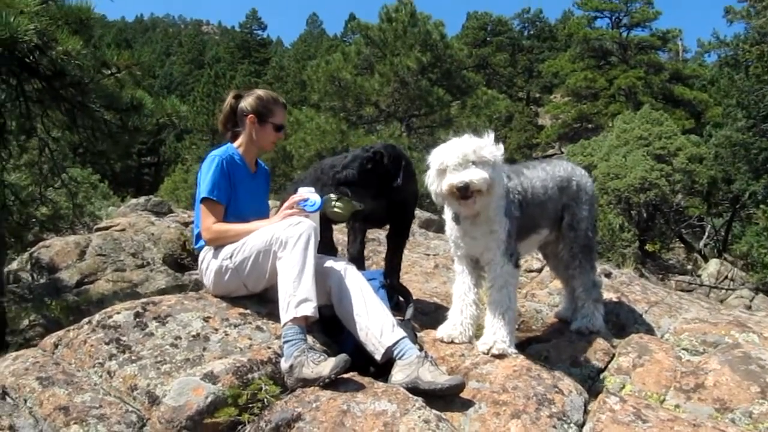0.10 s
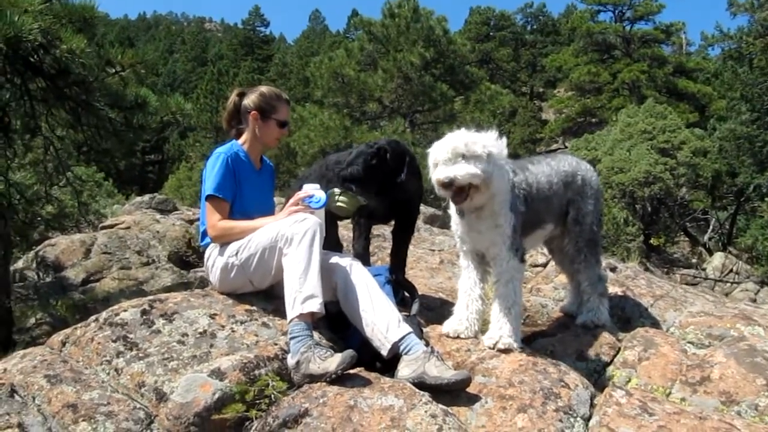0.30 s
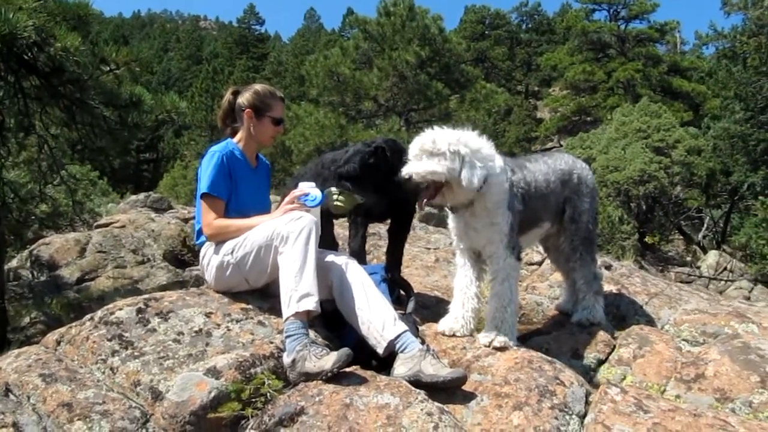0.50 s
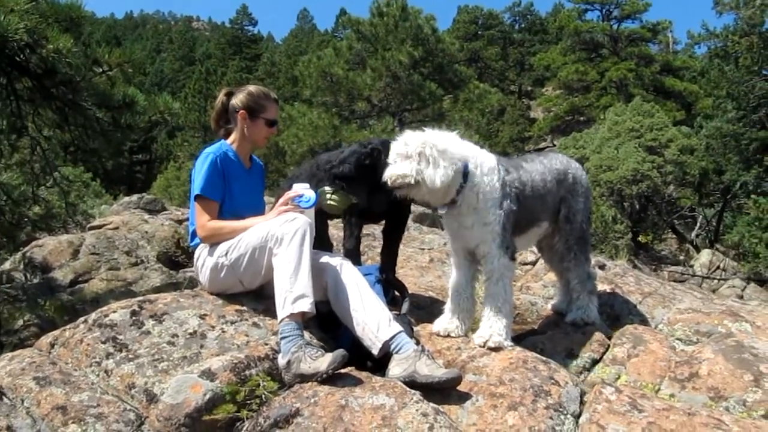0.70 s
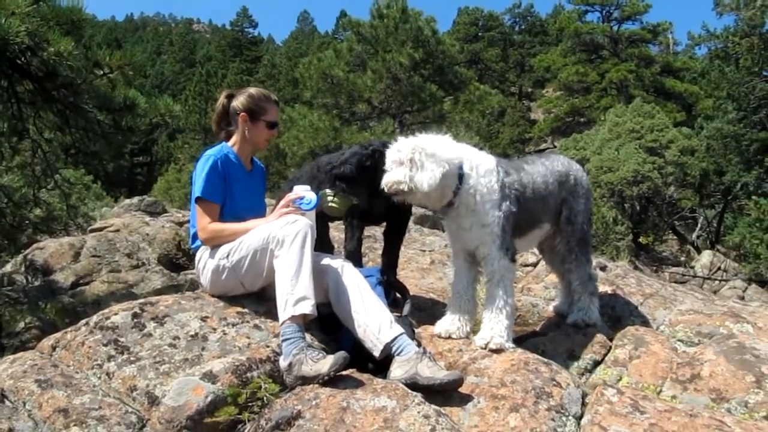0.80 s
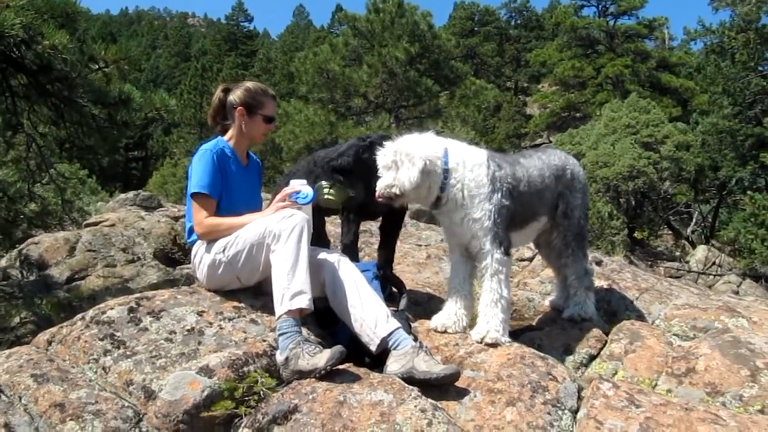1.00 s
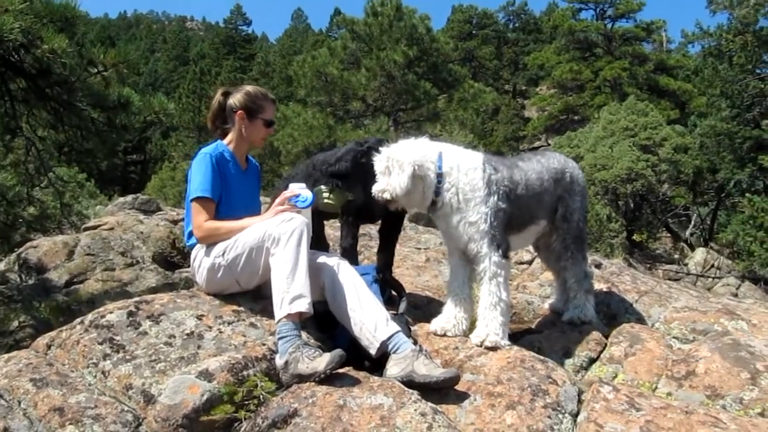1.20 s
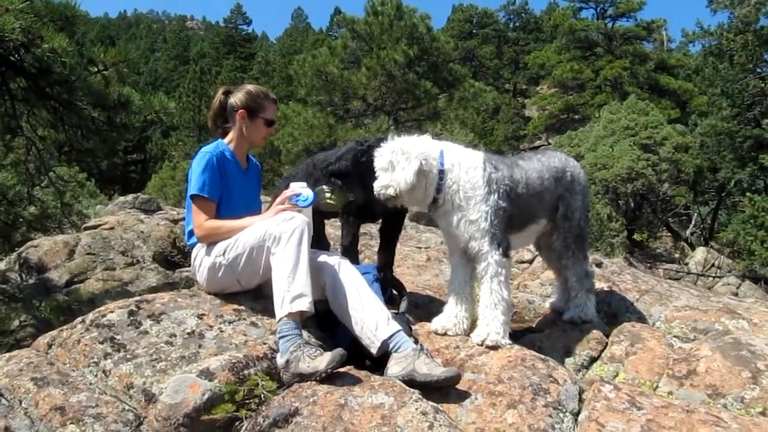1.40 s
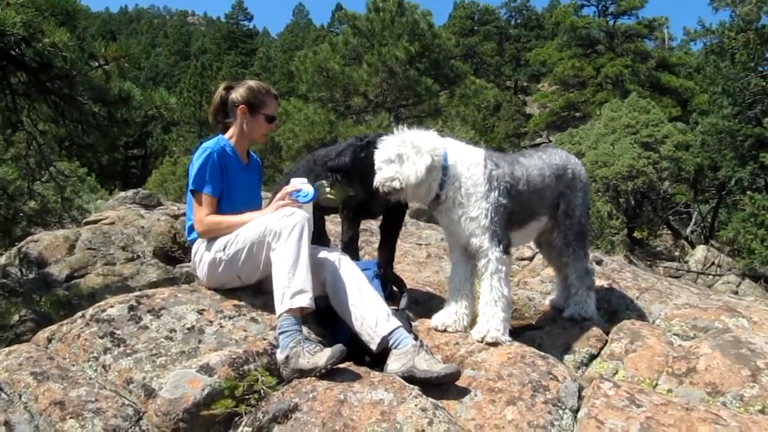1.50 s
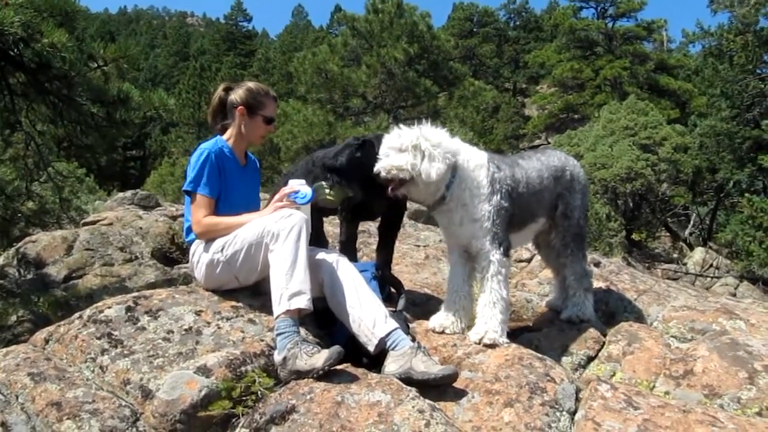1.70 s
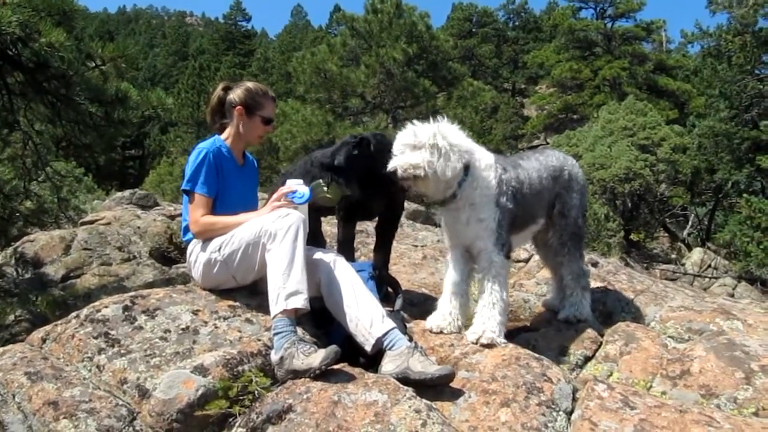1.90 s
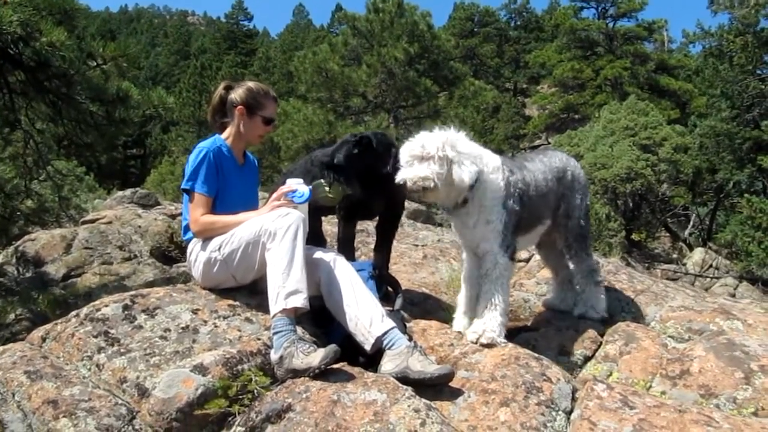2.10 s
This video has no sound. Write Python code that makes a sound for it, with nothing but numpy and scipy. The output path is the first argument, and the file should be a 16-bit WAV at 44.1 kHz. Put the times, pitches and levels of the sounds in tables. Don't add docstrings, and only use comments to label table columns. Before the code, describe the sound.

A dog laps water from a small cup in quick wet laps while wind buffets the microphone.

```python
import sys
import numpy as np
from scipy import signal
from scipy.fft import rfft, irfft
from scipy.io import wavfile
from scipy.ndimage import uniform_filter1d

SR = 44100
rng = np.random.default_rng(int(sys.argv[2]) if len(sys.argv) > 2 else 0)


def ratio_of_db(decibels):
    return 10 ** (np.asarray(decibels, float) / 20)


def log_audio(samples):
    frames = np.atleast_2d(samples).T
    limited = np.clip(frames, -1, 1)
    pcm = np.round(limited * 32767).astype(np.int16)
    wavfile.write(sys.argv[1], SR, pcm)


N = 94815


def evened(x):
    return x / np.sqrt(np.mean(x ** 2) + 1e-20)


def add(mix, s, sound):
    part = mix[max(round(s * SR), 0):][:len(sound)]
    part += sound[:len(part)]


def coloured(x, points):
    f, db = np.transpose(points)
    hz = np.fft.rfftfreq(len(x), 1 / SR)
    gain = ratio_of_db(np.interp(np.log(hz + 1), np.log(f + 1), db, -90, -90))
    return evened(irfft(rfft(x) * gain, len(x)))


def resonate(x, hz, width):
    turn = np.exp(2j * np.pi * hz * np.arange(len(x)) / SR)
    r = np.exp(-np.pi * width / SR)
    return 2 * (turn * signal.lfilter([1 - r], [1, -r], x / turn)).real


def steep(x, hz, width):
    for _ in range(3):
        x = resonate(x, hz, width)
    return evened(x)


def wander(size, length=N):
    noise = rng.standard_normal(length)
    return evened(uniform_filter1d(uniform_filter1d(noise, size), size))


def swells(rows, rise=0.05):
    out = np.zeros(N)
    for s, length, db in rows:
        u = np.arange(0, 1, 1 / (length * SR))
        fade = np.minimum((1 - u) / (1 - rise), 1) ** 0.38
        add(out, s, ratio_of_db(db) * np.minimum(u / rise, 1) * fade)
    return out


def trees():
    # f/Hz, level/dB
    leaf_spectrum = [(120, 1.5), (200, -1), (700, 0.5), (2100, -15), (7000, -27), (8000, -26), (11000, -29),
                     (15600, -41)]
    t = np.arange(N) / SR
    level_db = -38 - 2.5 * t + wander(size=400)
    return coloured(rng.standard_normal(N), leaf_spectrum) * ratio_of_db(level_db)


def whine():
    # f/Hz, level/dB
    tones = [(7853, -65), (7882, -58.5)]
    t = np.arange(N) / SR
    out = ratio_of_db(-69) * steep(rng.standard_normal(N), 7870, 260)
    for hz, db in tones:
        out += ratio_of_db(db - t + 0.33 * wander(size=2000)) * np.sin(2 * np.pi * hz * t)
    return out


def wind():
    # t/s, rumble level/dB, flutter relative to rumble/dB
    strength = [(0, -36, -6), (.25, -26.5, -4.5), (.4, -31, 7), (.47, -32, -0.5), (.56, -23, -8),
                (.7, -26, -8.5), (.77, -28.5, -2.5), (0.851, -17, -7.5), (1.04, -34.5, 9.5),
                (1.11, -22, -15), (1.221, -15, -4), (1.331, -24.5, 0), (1.52, -28.5, 8), (1.6, -27, -27),
                (1.69, -26.5, -6.5), (1.75, -21.5, -19), (1.88, -27.5, -6.5), (1.94, -25, -8),
                (2.15, -40, 5)]
    # f/Hz, level/dB
    rumble_spectrum = [(8, -10), (20, 13.5), (50, 7), (90, -9), (150, -59)]
    # f/Hz, level/dB
    flutter_spectrum = [(25, -17.5), (70, 1), (130, -9), (220, -18), (400, -26), (800, -86)]
    # centre t/s, peak level/dB, f/Hz, width/s
    eddies = [(0.296, -10.5, 123, 0.03), (0.352, -18, 151, 0.014), (0.39, -13.5, 120, 0.01),
              (0.865, 1.5, 178, 0.0075), (0.874, -9.5, 201, 0.0071), (0.919, -12, 110, 0.016),
              (0.995, -5, 102, 0.012), (1.027, -3.5, 97.5, 0.019), (1.169, -7, 200, 0.0091),
              (1.222, -7, 39.7, 0.033), (1.248, -2.5, 96.4, 0.022), (1.269, -7, 100, 0.03),
              (1.304, -7.5, 113, 0.01), (1.413, 0.5, 232, 0.0092), (1.453, -21.5, 217, 0.065),
              (1.47, -8.5, 149, 0.015), (1.484, -4.5, 326, 0.006), (1.496, -1, 180, 0.012),
              (1.505, -4, 200, 0.0044), (1.633, -13.5, 118, 0.015), (1.739, -13.5, 117, 0.015),
              (1.793, -12.5, 109, 0.0085), (1.871, -13.5, 77, 0.03), (1.431, -11.5, 92, 0.01),
              (1.519, -17.5, 88, 0.017), (1.5024, 0, 196, 0.0069), (1.4808, -1, 332, 0.0037),
              (1.536, -19.5, 220, 0.0065), (.712, -13.5, 25, 0.085), (0.889, -11.5, 111, 0.011),
              (1.336, -26, 150, 0.0087), (1.377, -13, 150, 0.0047), (1.032, -18, 206, 0.012),
              (1.4845, -15.5, 535, 0.0023), (1.4148, -11, 457, 0.0019), (0.317, -17.5, 165, 0.0068),
              (.967, -17, 129, 0.02), (1.211, -12.5, 172, 0.0072), (.95, -12.5, 99, 0.017),
              (1.49, -13, 400, 0.0071), (1.523, -22.5, 300, 0.0094)]
    s, db, rel_db = np.transpose(strength)
    t = np.arange(N) / SR
    rumble_db = np.interp(t, s, db)
    flutter_db = rumble_db + np.interp(t, s, rel_db) + 2.07 * wander(size=500)
    out = ratio_of_db(rumble_db) * coloured(rng.standard_normal(N), rumble_spectrum)
    out += ratio_of_db(flutter_db) * coloured(rng.standard_normal(N), flutter_spectrum)
    u = np.arange(-1500, 1500) / SR
    for s, db, hz, width in eddies:
        swirl = rng.standard_normal(3000)
        turns = hz * u * (1 + 0.23 * u / width) + swirl[0]
        thump = np.cos(2 * np.pi * turns) * np.exp(-(2.95 * u / width) ** 2)
        churn = 0.22 * steep(swirl, 1.6 * hz, 1.4 * hz) * np.exp(-(1.6 * u / width) ** 2)
        add(out, s + u[0], ratio_of_db(db - 1.5) * (thump + churn))
    return out


def spray():
    # start t/s, length/s, level/dB
    strokes = [
        (0., 0.22, -49),
        (.215, 0.11, -41.5),
        (.575, .13, -40.5),
        (.89, 0.045, -40),
        (1.205, 0.077, -40.5),
        (1.52, 0.075, -43.5),
        (1.835, 0.082, -42),
    ]
    # f/Hz, level/dB
    spray_spectrum = [(410, -50), (700, -51), (895, -10), (1560, -8.5), (2310, -14.5), (4580, -20.5),
                      (7120, -29.5), (10500, -22.5), (15500, -52)]
    bursts_per_s, spread_db, idle_db = 3400, 5, -53.5
    burst = rng.random(N) < bursts_per_s / SR
    size = ratio_of_db(spread_db * np.minimum(rng.exponential(1, N), 4)) * burst
    kind = rng.integers(0, 24, N)
    t, fizz = np.arange(600) / SR, np.zeros(N)
    for k, hz in enumerate(np.geomspace(800, 13000, 24)):
        grain = np.sin(2 * np.pi * hz * t) * ratio_of_db(-60 * t * hz ** 0.72 / 3.4)
        grain *= hz ** 0.5 / np.linalg.norm(grain)
        fizz += signal.oaconvolve(size * (kind == k), grain)[:N]
    hiss = 0.45 * rng.standard_normal(N) * ratio_of_db(4.5 * wander(size=150))
    wet = coloured(evened(fizz) + hiss, spray_spectrum)
    return wet * (swells(strokes, rise=0.1) + ratio_of_db(idle_db))


def pants():
    # start t/s, length/s, level/dB, airway f/Hz
    breaths = [
        (0.049, 0.062, -40, 3090),
        (0.313, 0.077, -43, 2960),
        (0.456, 0.031, -45, 2740),
        (1.788, 0.074, -45.5, 2660),
    ]
    out = np.zeros(N)
    for s, length, db, hz in breaths:
        breath = rng.standard_normal(round(length * SR))
        air = steep(breath, hz, 390)
        air += 0.47 * steep(breath, 0.74 * hz, 290)
        air += 0.15 * steep(breath, 1.48 * hz, 600)
        swell = np.sin(np.pi * np.arange(len(breath)) / len(breath)) ** 0.51
        add(out, s, ratio_of_db(db) * evened(air) * swell)
    return out


def drops():
    # t/s, peak level/dB, f/Hz
    early_drops = [(.066, -18.5, 4830), (.1635, -28, 10400), (.219, -25.5, 10600), (.228, -34, 10700),
                   (.239, -20.5, 10400), (.276, -18.5, 4600), (.295, -25, 4950), (.317, -19.5, 5000),
                   (.512, -18, 4300), (.5975, -20, 4800), (.606, -17.5, 6160), (.6257, -28, 8600),
                   (.637, -27, 10300), (.804, -21.5, 4640), (.826, -21, 3570), (.897, -23, 9300),
                   (.932, -23.5, 9800), (.9465, -28, 10000), (.9855, -15.5, 4320), (.994, -16, 4700),
                   (1.0445, -23, 5230), (1.2446, -25, 10200), (1.36, -17, 9500), (1.367, -23.5, 4400),
                   (1.446, -21.5, 3700), (1.5664, -30, 8150), (1.5756, -18.5, 10500)]
    # t/s, peak level/dB, f/Hz
    late_drops = [
        (1.613, -32, 8900),
        (1.67, -27, 8800),
        (1.672, -21, 5370),
        (1.851, -11, 5300),
        (1.8545, -20.5, 8800),
        (1.883, -19.5, 9800),
        (1.89, -19.5, 4330),
        (1.919, -24, 4530),
        (1.953, -24.5, 4130),
        (2.121, -18, 3870),
    ]
    out, t = np.zeros(N), np.arange(1500) / SR
    for s, db, hz in list(early_drops) + list(late_drops):
        noise = rng.standard_normal(1500)
        snap = steep(noise, hz, 0.35 * hz) + 0.19 * steep(noise[::-1], 9600, 1900)
        decay = ratio_of_db(db - 14 - 60 * t / 0.021)
        add(out, s, decay * np.minimum(t / 0.00072, 1) * snap)
    return out


def plops():
    # t/s, peak level/dB, f/Hz
    pockets = [(0.1357, -25, 1284), (0.1409, -25, 1190), (0.239, -36, 1870), (0.5022, -27.5, 1956),
               (0.5124, -30, 1646), (0.5819, -24, 1317), (0.597, -27, 1985), (0.664, -33, 2950),
               (0.589, -28, 1440), (0.7077, -28.5, 1350), (0.8277, -27.5, 1180),
               (0.8973, -28.5, 1537), (0.9386, -30.5, 2570), (0.9567, -31.5, 1264),
               (0.973, -32, 1165), (1.1438, -34.5, 1550), (1.2231, -20, 1617), (1.2456, -34, 2010),
               (1.257, -34, 1500), (1.27, -23.5, 1424), (1.3611, -27.5, 1226), (1.4465, -34, 2000),
               (1.5607, -38, 1510), (1.585, -28, 1547), (1.8462, -28.5, 3110), (1.8528, -18.5, 1550),
               (1.2365, -34, 1560), (1.8907, -30, 1540), (1.9285, -36, 2760), (1.9864, -36, 1060)]
    # t/s, peak level/dB, f/Hz
    more_pockets = [(.311, -36, 3044), (.2385, -26.5, 1126), (.241, -20, 603), (0.602, -17.5, 631),
                    (0.899, -24, 810), (0.581, -41, 2850), (1.034, -31, 970), (1.215, -29.5, 2370),
                    (1.291, -35.5, 2330), (1.298, -38, 3260), (1.742, -40.5, 2090), (2.022, -43, 2100)]
    ring_s = 0.038
    out, t = np.zeros(N), np.arange(3000) / SR
    onset = np.sin(np.pi / 2 * np.minimum(t / 0.00062, 1)) ** 2
    for s, db, hz in list(pockets) + list(more_pockets):
        wobble = ratio_of_db(4.63 * wander(50, 3000))
        decay = ratio_of_db(-60 * t / ring_s * (hz / 1000) ** 0.063)
        ring = np.sin(2 * np.pi * hz * (t + 1.2 * t ** 2)) * wobble * decay
        slap = steep(rng.standard_normal(3000), 1.62 * hz, hz) * ratio_of_db(-13 - 60 * t / 0.063)
        add(out, s, ratio_of_db(db) * onset * (ring + slap))
    return out


def ticks():
    # t/s, peak level/dB, centre f/Hz
    slaps = [(.2385, -37, 1200), (.3167, -34, 8000), (0.582, -44, 1500), (0.5962, -41, 2500),
             (0.6256, -24.5, 8000), (0.637, -41, 7000), (.681, -34, 6000), (.8984, -24.5, 3820),
             (.939, -46, 3000), (1.214, -25.5, 1500), (1.2463, -32, 6000), (1.258, -33, 7000),
             (1.3613, -29, 5000), (1.5321, -33, 2450), (1.584, -31.5, 2600), (1.6696, -48, 6000),
             (1.8521, -20, 2900), (1.877, -32, 4000), (1.89, -23.5, 2500), (1.986, -37, 1200),
             (.502, -40, 1970), (.229, -44, 10000), (.947, -35, 10000), (.267, -38, 8000),
             (1.922, -35, 9000), (2.134, -29.5, 2980)]
    out, t = np.zeros(N), np.arange(500) / SR
    for s, db, hz in slaps:
        crackle = rng.standard_normal(500) * ratio_of_db(-60 * t / 0.028)
        click = (t == 0) * 3.2
        snap = resonate(resonate(click + crackle, hz, 0.76 * hz), hz, 2.4 * hz)
        add(out, s, ratio_of_db(db) * snap / abs(snap).max())
    return out


def slides():
    # start t/s, length/s, peak level/dB, start f/Hz, end f/Hz
    bends = [
        (0.259, .006, -36, 2630, 3000),
        (0.683, 0.012, -23, 1370, 2360),
        (1.271, .009, -28, 1290, 1600),
        (1.838, .016, -28.5, 960, 1280),
        (1.851, 0.033, -18.5, 1025, 1604),
        (1.885, 0.0084, -29, 2480, 2750),
        (1.891, 0.021, -23.5, 1640, 1330),
        (.598, 0.0063, -27, 2040, 1880),
    ]
    out = np.zeros(N)
    for s, length, db, start_hz, end_hz in bends:
        u = np.arange(0, 1, 1 / (length * SR))
        turns = np.cumsum(start_hz + (end_hz - start_hz) * u ** 0.83) / SR
        edges = np.minimum(u / 0.13, 1) * np.minimum((1 - u) / 0.09, 1)
        add(out, s, ratio_of_db(db - 25.3 * u ** 1.13) * edges * np.sin(2 * np.pi * turns))
    return out


def insect():
    # start t/s, length/s, level/dB
    buzzes = [
        (.77, 0.52, -64),
        (1.76, 0.64, -65),
    ]
    return steep(rng.standard_normal(N), 11420, 300) * swells(buzzes, rise=0.11)


def scene():
    surroundings = trees() + whine() + wind() + pants() + insect()
    lapping = spray() + drops() + plops() + ticks() + slides()
    echo = 0.073 * np.roll(lapping, 170)
    return (lapping + echo + surroundings)[None]


def band_limit(x):
    return signal.sosfilt(signal.butter(12, 15780, fs=SR, output="sos"), x)


def record(dry):
    kneed = dry / (1 + dry ** 8) ** 0.125
    taps = signal.firwin(801, 15780, window=("kaiser", 11), fs=SR)[None]
    mix = signal.oaconvolve(kneed, taps, "same")
    return band_limit(mix)


dry = scene()
out = record(dry)
log_audio(out)
```